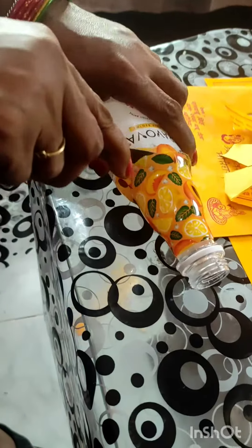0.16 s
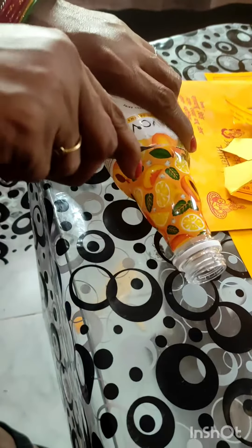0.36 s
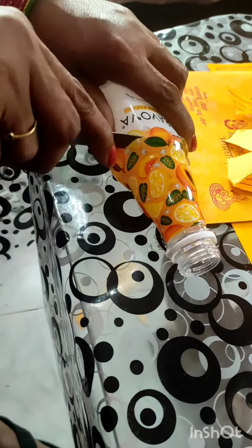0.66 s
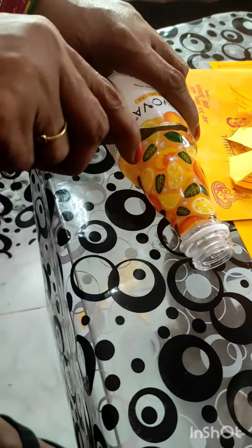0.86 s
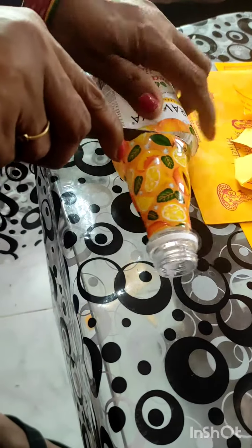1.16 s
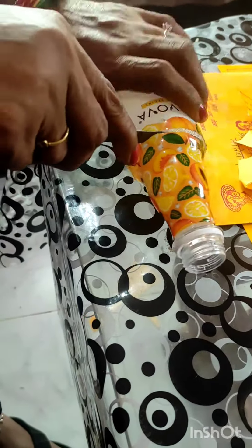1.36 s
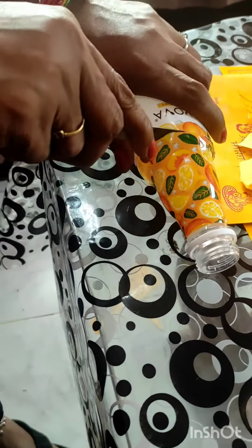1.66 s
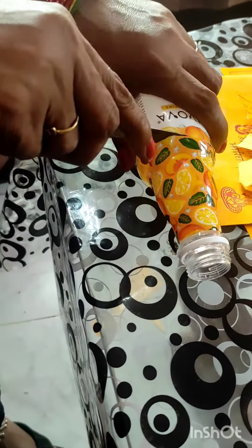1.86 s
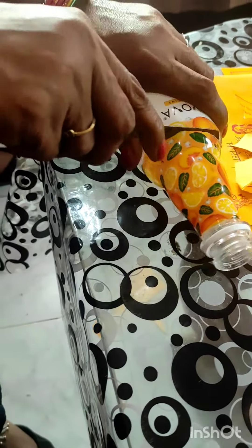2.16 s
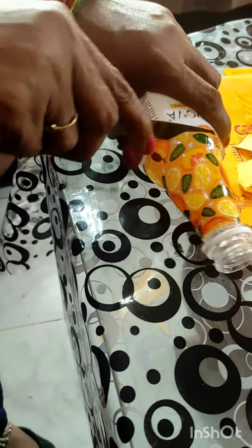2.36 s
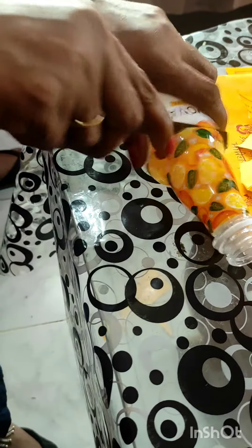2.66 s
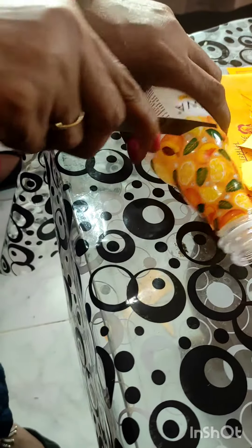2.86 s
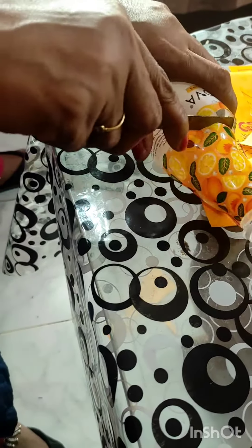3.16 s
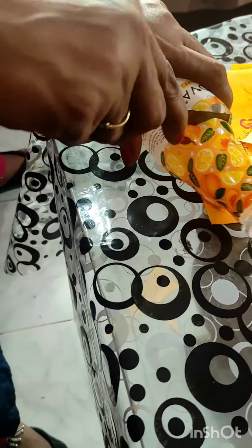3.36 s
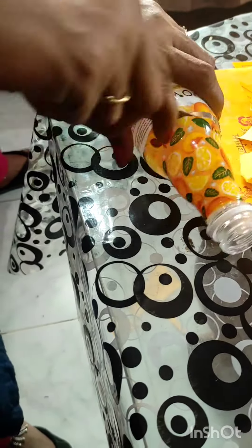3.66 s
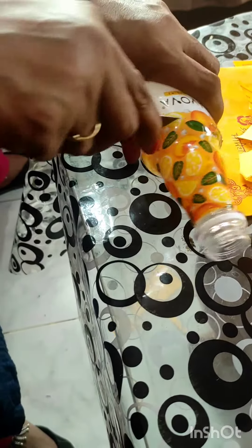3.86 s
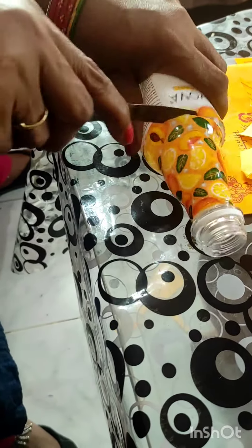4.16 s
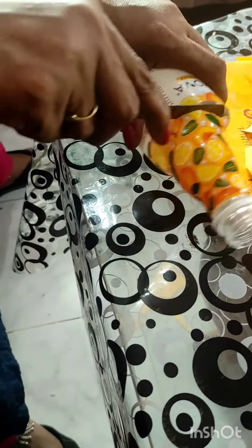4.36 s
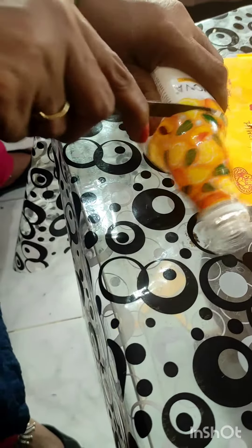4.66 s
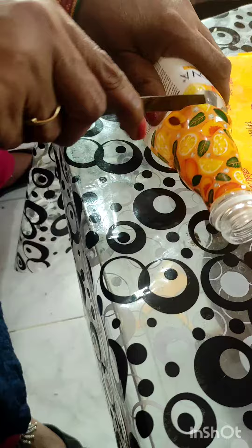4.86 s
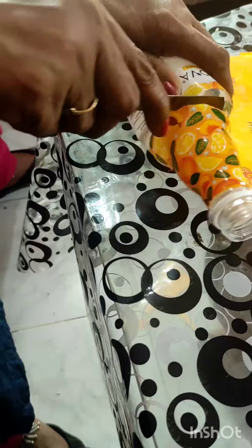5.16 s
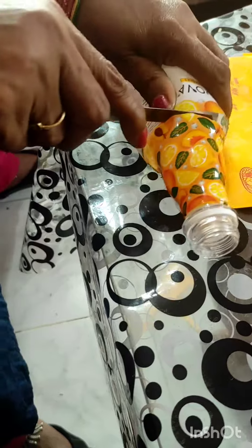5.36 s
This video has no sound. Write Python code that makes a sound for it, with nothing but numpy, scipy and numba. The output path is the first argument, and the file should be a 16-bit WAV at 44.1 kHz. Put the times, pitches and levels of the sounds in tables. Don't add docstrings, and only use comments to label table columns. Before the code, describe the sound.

A thin empty plastic bottle is gripped on a table and cut with a knife, heard very close on a stereo phone in a small, hard, echoing room. Faint low room noise runs throughout. Small ticks lead to a sharp crack near 0.45 s, smaller crackles, then a hollow snap at 0.9 and another at 1.3. From about 1.4 to 2.0 there is only light rubbing and tiny finger creaks. At 2.1 a hard double crack breaks out, followed by pops and crackling until 3.0, with deeper, slacker dents. A lull follows until 3.6. Between 3.6 and 4.4 snaps, ticks and hollow ringing pops crowd together with a stronger scrape near 4.1. Another dense, rapid burst comes at 4.6 to 4.8, then a loud crack with hollow rubbing around 5.0, and a last snap and woody fold near 5.3. Soft thuds against the table lie underneath.

```python
import sys
import numpy as np
from scipy import signal
from scipy.fft import rfft, irfft, next_fast_len
from scipy.io import wavfile
from scipy.ndimage import uniform_filter1d
from numba import njit

SR = 44100
rng = np.random.default_rng(int(sys.argv[2]) if len(sys.argv) > 2 else 0)


def persist_wave(psi):
    counts = np.round(np.clip(psi, -1, 1) * 32767).astype(np.int16)
    wavfile.write(sys.argv[1], SR, np.atleast_2d(counts).T)


def invert_db(x):
    u = np.asarray(x, float) / 20
    return 10 ** u


N = 242682


def unit(x):
    return x / np.sqrt(np.mean(x ** 2))


def on_log(hz, points):
    return np.interp(np.log(np.maximum(hz, 1)), np.log([p[0] for p in points]), [p[1] for p in points])


def colour(x, points, size=2048):
    log_gain = on_log(np.fft.rfftfreq(size, 1 / SR), points) * np.log(10) / 20
    cepstrum = irfft(log_gain)
    cepstrum[1:size // 2] *= 2
    cepstrum[size // 2 + 1:] = 0
    impulse_response = irfft(np.exp(rfft(cepstrum)))
    return signal.fftconvolve(x, impulse_response)[:len(x)]


def band(x, lo_hz, hi_hz, order=2):
    edges_hz = [lo_hz, min(hi_hz, .45 * SR)]
    return signal.sosfilt(signal.butter(order, edges_hz, "bandpass", fs=SR, output="sos"), x)


def add(out, s, burst):
    i = max(int(s * SR), 0)
    out[..., i:i + burst.shape[-1]] += burst[..., :out.shape[-1] - i]


def pair(size, shared, channels=2):
    common, *own = rng.standard_normal((channels + 1, size))
    shared = np.clip(shared, 0, 1)
    return np.sqrt(shared) * common + np.sqrt(1 - shared) * np.array(own)


# (frequency [Hz], spectral density [dB])
HOUSE_SPECTRUM = [(25, -5), (55, -0.5), (113, -12), (162, 4), (379, -3.5), (716, -6.5), (905, -14),
                  (3380, -27.5), (4000, -26), (5200, -47), (8800, -120)]


def hum():
    noise = np.array([colour(v, HOUSE_SPECTRUM, size=8192) for v in pair(N, shared=0.66)])
    return invert_db(-54.5) * unit(noise)


# (time [s], hiss level [dB], hollow rumble level [dB])
RUBBING = [(0.0, -44, -52), (0.41, -69.5, -58), (0.52, -63, -47), (1.1, -42.5, -53), (1.17, -55.5, -48),
           (1.75, -52, -71), (2.03, -56.5, -59), (2.1, -52, -65), (2.22, -38.5, -48), (2.86, -64, -47),
           (3.25, -72, -50.5), (3.42, -50.5, -58.5), (3.6, -59.5, -50.5), (4.14, -35.5, -31.5),
           (4.55, -54, -48), (4.9, -49.5, -30.5), (5.5, -68, -57)]


def rubbing():
    s, hiss_db, hollow_db = np.transpose(RUBBING)
    t = np.arange(N) / SR
    slips = (rng.random(N) < 300 / SR) * invert_db(3 * rng.exponential(size=N))
    slip_decay = np.exp(-1 / (0.00092 * SR))
    grain = 4.9 + .5 * unit(signal.lfilter([1], [1, -slip_decay], slips))
    hiss = unit(band(grain * pair(N, shared=0.043), 1540, 11300, order=1))
    swell = uniform_filter1d(grain, 300) ** 6.0
    hollow = unit(band(swell * pair(N, shared=0.9), 232, 1170))
    hiss_gain = invert_db(np.interp(t, s, hiss_db) - 9.5)
    hollow_gain = invert_db(np.interp(t, s, hollow_db) - 7.5)
    return hiss * hiss_gain + hollow * hollow_gain


# (frequency [Hz], bandwidth [Hz], level [dB])
AIR_MODES = [(525, 30, 0), (1480, 130, -14), (2240, 170, -14)]


def air_column(x):
    return sum(invert_db(db) * band(x, hz - width / 2, hz + width / 2, order=1) for hz, width, db in AIR_MODES)


# (frequency [Hz], decay time T60 [s], level [dB])
ROOM_DECAY = [(216, 0.44, -9), (480, 0.32, -16), (910, 0.39, -5.5), (1300, 0.34, -4.5), (3630, 0.5, -9.5),
              (10000, 0.38, -11)]


def room(x):
    t, tail = np.arange(int(.5 * SR)) / SR, 0
    for hz in 120 * 2 ** np.arange(0, 7.5, .5):
        t60_s = on_log(hz, [r[:2] for r in ROOM_DECAY])
        db = on_log(hz, [r[::2] for r in ROOM_DECAY])
        echoes = pair(len(t), shared=1.1 - hz / 900, channels=8)
        echoes = band(echoes, hz / 1.306, min(hz * 1.39, .44 * SR))
        build_up = 1 - np.exp(-np.maximum(t - .004, 0) / 0.0026)
        fade = build_up * 1000 ** (-t / t60_s)
        tail = tail + invert_db(db) * echoes * fade / np.sqrt(np.sum(fade ** 2))
    size = next_fast_len(N + len(t))
    paths = rfft(tail.reshape(4, 2, -1), size)
    return irfft(np.sum(rfft(x, size)[:, None] * paths, axis=0), size)[:, :N]


# (time [s], wall tone [Hz], wall tone level [dB], air ring level [dB])
CUT_STATE = [
    (0.0, 1960, 7.5, -5),
    (0.6, 1870, -7.5, 7.5),
    (0.9, 1300, -1.5, 4),
    (2.1, 1576, 2, 3),
    (2.75, 968, 1.5, -4),
    (4.1, 980, -3, 7),
    (4.3, 1400, 0.5, 9),
    (4.7, 958, 2, -13),
    (5.0, 1934, -2, 1),
    (5.3, 1030, -3, -6),
]


def cut(s, index):
    state = np.array(CUT_STATE)
    return np.interp(s, state[:, 0], state[:, index])


# (time [s], crack level [dB], dent level [dB], dent pitch [Hz])
WALL_SNAPS = [(0.112, -24.5, -42, 506), (0.4545, -4, -21.5, 558), (0.597, -12.5, -25, 537),
              (0.6985, -24, -28, 594), (0.9206, -4.5, -5, 614), (1.288, -5, -20, 532),
              (2.0837, -8.5, -36, 680), (2.1165, 5.5, -13.5, 663), (2.16, 2.5, -13.5, 523),
              (2.2736, -30, -6, 539), (2.5467, 1.5, -9, 600), (2.7385, -16, -6.5, 592),
              (2.805, -6, -5.5, 447), (3.0104, -4.5, -8.5, 497), (3.6355, -7.5, -8, 529),
              (3.869, -9.5, -25.5, 550), (3.9404, 1.5, -7.5, 517), (3.982, -1.5, -13.5, 506),
              (4.0114, -9, -15.5, 495), (4.1603, -36, -3, 571), (4.3293, -2, -12, 488),
              (4.6183, -27.5, -25.5, 574), (4.66, -2.5, -8, 590), (4.6755, 1.5, -13, 504),
              (4.7295, 1, -9, 504), (4.7454, -12, -9.5, 705), (4.764, -7.5, -10.5, 508),
              (4.776, -10.5, -8.5, 576), (4.9917, 4, -10.5, 526), (5.269, -6, -12, 682)]
# (time [s], crack level [dB], wall tone relative to crack [dB])
BLADE_TICKS = [(0.3744, -13.5, -30), (0.4056, -30.5, -2.5), (0.4252, -21.5, -12.5), (0.6719, -22, -1),
               (0.7991, -26.5, -11.5), (0.884, -27, -10), (0.9713, -19, -37), (2.0572, -26, -8.5),
               (2.073, -29, -25), (2.263, -12.5, -35), (2.2951, -7.5, -25), (2.5777, -3.5, -19),
               (2.591, -2, -46), (2.7195, -19.5, -9.5), (2.886, -18.5, -20), (3.6394, -3, -13.5),
               (3.656, -9, -10), (3.715, -4, -19.5), (3.9275, -9.5, -18.5), (3.9479, -3, -23),
               (4.0163, -14, -3.5), (4.0771, -8.5, -14.5), (4.157, -12, -4.5), (4.2702, -8, -17.5),
               (4.2807, -9.5, -18), (4.7402, -4, -19), (4.7859, -6, -12), (4.9954, -7.5, -8.5),
               (5.032, -4, -18), (5.2586, -15, -4)]
# (time [s], rasp level [dB])
FINGER_CREAKS = [(0.627, -24), (0.686, -20.5), (0.854, -40), (1.2198, -32.5), (1.6864, -40.5),
                 (1.77, -40.5), (1.8099, -42), (1.844, -36.5), (1.8872, -39), (1.937, -44), (2.439, -31),
                 (2.4937, -26.5), (2.7561, -16), (2.9578, -29.5), (2.995, -29), (3.296, -53), (3.4461, -37),
                 (3.482, -37), (3.5174, -38), (4.1281, -15), (4.2336, -29.5), (4.2614, -19), (5.2531, -18)]
# (time [s], wall tone level [dB], pitch [Hz])
WOODY_TONES = [
    (0.9203, -11, 1180),
    (1.288, -15.5, 1080),
    (2.2724, -14, 1108),
    (2.776, -11, 1110),
    (3.0108, -6, 900),
    (4.0984, -18, 1030),
    (4.353, -12.5, 1370),
    (4.9194, -22, 910),
    (5.2747, -13, 1030),
]


def all_cracks():
    def quick_ms(db):
        return 1.61 - 0.1352 * db

    rows = []
    for s, db, dent_db, _ in WALL_SNAPS:
        wall_db = -5.5 + cut(s, index=2) + 0.57 * dent_db + 0.44 * db
        rows.append((s, db, wall_db, cut(s, index=1), quick_ms(db)))
    for s, db, wall_db in BLADE_TICKS:
        rows.append((s, db, db + wall_db, cut(s, index=1), quick_ms(db)))
    for s, db in FINGER_CREAKS:
        rows.append((s, db, db - 19.5, cut(s, index=1), 6.7))
    for s, db, hz in WOODY_TONES:
        rows.append((s, db - 65, db, hz, 1.49))
    return rows


def cracks():
    treble, middle, t = np.zeros((4, N)), np.zeros((4, N)), np.arange(1024) / SR
    for s, db, wall_db, hz, ms in all_cracks():
        span = max(ms, .3) / 1000
        top_hz = np.clip(18001 + 220 * db, 9000, 19000)
        rasp = band(pair(len(t), shared=0.71, channels=4), 410, top_hz, order=1)
        envelope = (1 - np.exp(-t / 0.000037)) * np.exp(-(t / span) ** 1.054)
        add(treble, s - .0006, invert_db(db) * rasp * envelope)
        roughness = band(pair(len(t), shared=0.4, channels=4), hz / 5.0, hz * 1.32, order=1)
        tone = 0.25 * np.sin(2 * np.pi * hz * t) + roughness
        add(middle, s - .0006, invert_db(wall_db) * tone * t / span * np.exp(-(t / span / 1.708) ** 2))
    return invert_db(-6.5) * band(treble, 1960, 21500) + invert_db(10) * band(middle, 440, 6000, order=1)


def flip(hz, cycles, phase, sink):
    cycles = max(cycles, 1.5)
    u = np.arange(int(cycles * SR / hz)) / (cycles * SR / hz)
    swell = np.sin(np.pi * u ** 0.49) ** 0.92
    turns = cycles * ((1 + sink) * u - sink * u ** 2)
    return swell * np.sin(2 * np.pi * turns + phase)


# (time [s], peak level [dB], pitch [Hz], air ring relative to dent [dB])
LONE_DENTS = [(0.16, -43, 515, 16.5), (0.194, -43, 510, 10), (0.376, -46.5, 520, 17), (0.425, -40, 487, 20),
              (0.483, -32.5, 500, 10.5), (0.629, -26.5, 476, 6), (0.668, -28, 562, 19.5),
              (0.691, -30, 533, 20), (1.038, -34, 492, 2), (2.3, -12.5, 473, 0.5), (2.317, -17, 503, 7.5),
              (2.72, -30, 547, -3), (2.748, -14, 398, -6), (2.773, -15, 362, -14), (2.78, -12.5, 610, -26),
              (2.825, -12, 840, -14), (3.044, -34.5, 439, 19.5), (3.928, -34, 556, 21),
              (4.079, -36, 626, -10), (4.099, -19.5, 524, 6), (4.126, -17.5, 553, -2), (4.189, -24, 608, 7),
              (4.349, -15.5, 512, 6.5), (4.74, -15.5, 530, 1), (4.794, -7, 532, -21),
              (4.925, -23.5, 592, 6), (5.01, -11.5, 590, -6), (5.201, -29.5, 595, -17),
              (5.259, -24, 855, 18), (5.28, -14.5, 700, 5)]


def all_dents():
    rows = []
    for s, _, db, hz in WALL_SNAPS:
        ring_db = -17 + cut(s, index=3) - 0.89 * db
        rows.append((s + 0.001466, db, hz, 4.825, ring_db))
    for s, db, hz, ring_db in LONE_DENTS:
        rows.append((s, db, hz, 4.7, ring_db))
    for s, db in FINGER_CREAKS:
        rows.append((s, min(db, -30) - 7.5, 495, 4.7, 0))
    return rows


def pops():
    out, (air_hz, width, _) = np.zeros(N), AIR_MODES[0]
    for s, db, hz, cycles, ring_db in all_dents():
        phase = rng.uniform(0, 2 * np.pi)
        dent = invert_db(db - 1.0) * flip(hz, cycles, phase, sink=0.34)
        dent = np.pad(dent, (0, 3000))
        ring_hz = air_hz * (hz / air_hz) ** 0.6
        ring = band(dent, ring_hz - width / 2, ring_hz + width / 2, order=1)
        add(out, s - .002, dent + invert_db(ring_db + 2) * ring)
    return band(out, 200, 6000)


# (time [s], peak level [dB], pitch [Hz])
TABLE_BUMPS = [(0.628, -44, 278), (0.675, -39, 206), (2.158, -42, 293), (2.302, -27.5, 276),
               (2.318, -32.5, 335), (2.785, -33, 320), (2.755, -30, 238), (2.771, -35, 300),
               (2.839, -42, 174), (3.87, -43, 305), (3.981, -25.5, 268), (4.097, -29, 264),
               (4.158, -26, 279), (4.74, -38, 299), (4.995, -33, 204), (5.314, -37.5, 267)]


def bumps():
    out = np.zeros(N)
    for s, db, hz in TABLE_BUMPS:
        phase = rng.uniform(0, 2 * np.pi)
        add(out, s - .003, invert_db(db + 3.5) * flip(hz, 3.73, phase, sink=0.46))
    return band(out, 60, 600)


def scene():
    scrape = cracks() + np.tile(rubbing(), (2, 1))
    bottle = scrape + 4.7 * air_column(scrape) + pops() + bumps()
    near = bottle[:2].copy()
    left_lag = 9
    near[0] = np.interp(np.arange(N) - left_lag, np.arange(N), near[0])
    return near + invert_db(-8.0) * room(bottle) + hum()


@njit
def duck(peak, top, slope, attack, release):
    gain, e = np.ones(len(peak)), 0.
    for i in range(len(peak)):
        e += (peak[i] - e) * (attack if peak[i] > e else release)
        if e > top:
            gain[i] = (top / e) ** slope
    return gain


def top_cut(x):
    return signal.sosfilt(signal.butter(12, 16650, fs=SR, output="sos"), x)


# (frequency [Hz], gain [dB])
LEFT_RESPONSE = [(40, 2.5), (200, -0.5), (2200, 2), (2800, -2.5), (3600, -0.5), (5500, -2.5), (7500, 7.5),
                 (8700, 16), (9500, 1), (10500, -6.5), (15200, -21), (16600, -99)]
RIGHT_RESPONSE = [(40, 0), (200, -3.5), (2000, 0), (2700, 0.5), (3300, 1), (4700, 1), (6300, 8), (7300, 18),
                  (8600, 9.5), (10500, -17), (15200, -15), (16600, -50)]


def record(dry):
    x = np.array([colour(dry[0], LEFT_RESPONSE), colour(dry[1], RIGHT_RESPONSE)])
    x = x * duck(np.abs(x).max(axis=0), 0.46, .3, 1 / (.012 * SR), 1 / (0.031 * SR))
    x = np.tanh(.9 * x) / .96
    x = signal.sosfilt(signal.cheby1(10, .2, 15300, fs=SR, output="sos"), x)
    return top_cut(x)


dry = scene()
out = record(dry)
persist_wave(out)
```